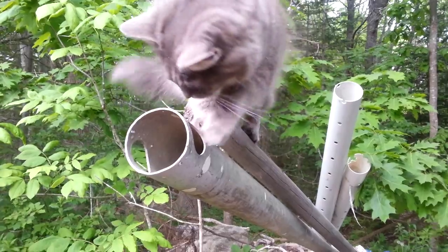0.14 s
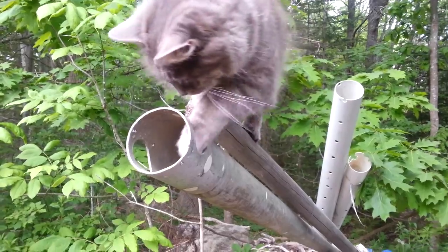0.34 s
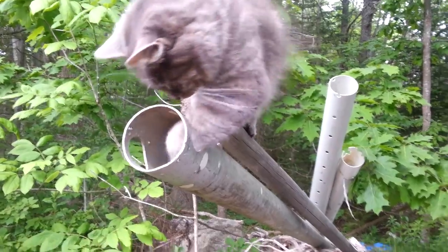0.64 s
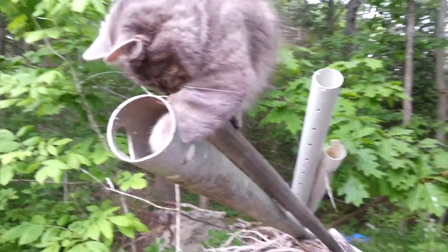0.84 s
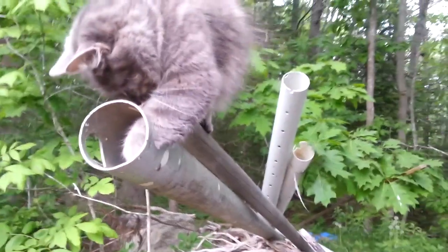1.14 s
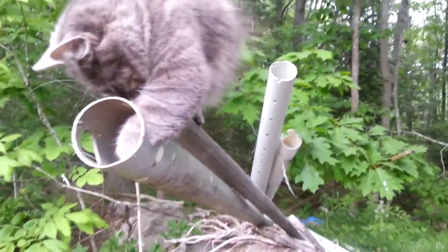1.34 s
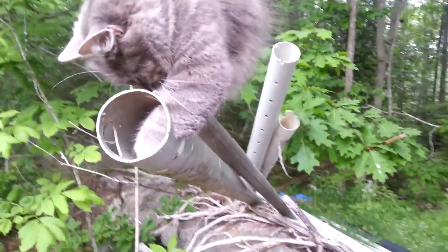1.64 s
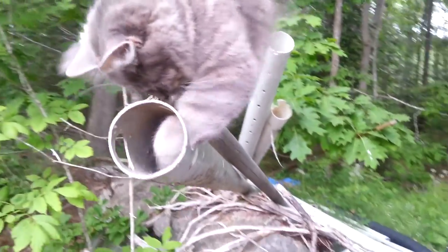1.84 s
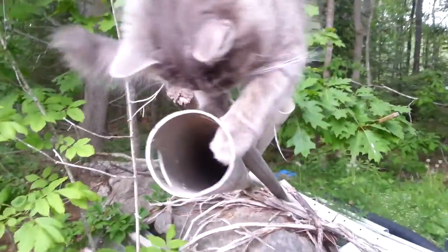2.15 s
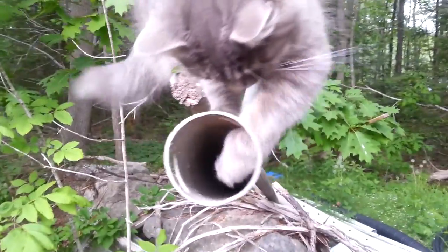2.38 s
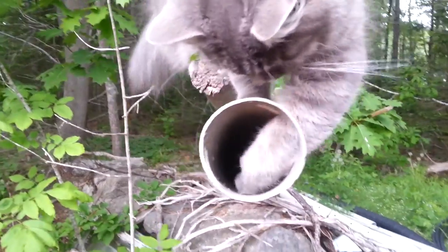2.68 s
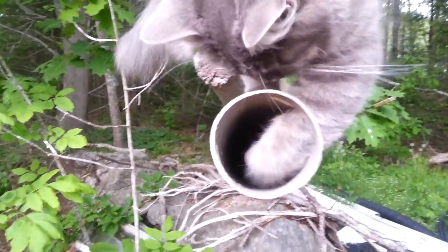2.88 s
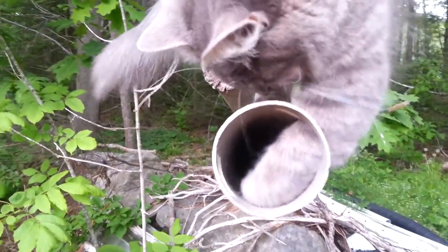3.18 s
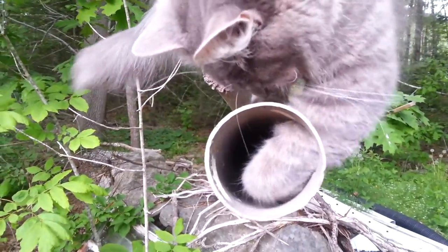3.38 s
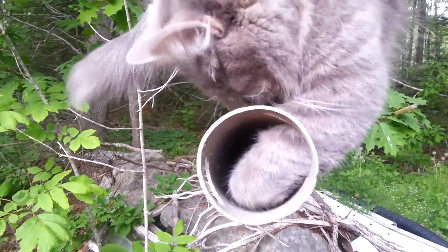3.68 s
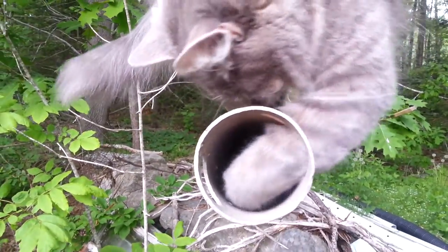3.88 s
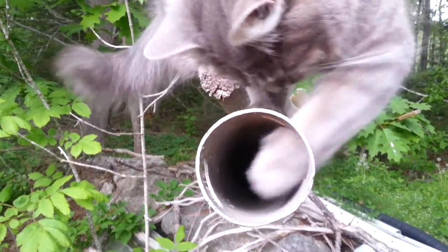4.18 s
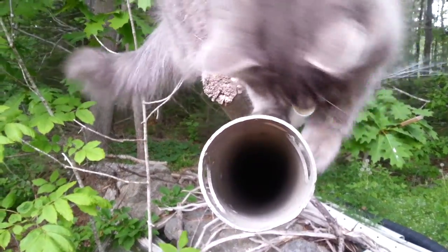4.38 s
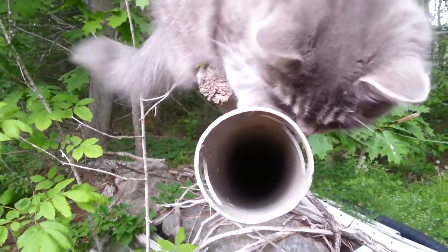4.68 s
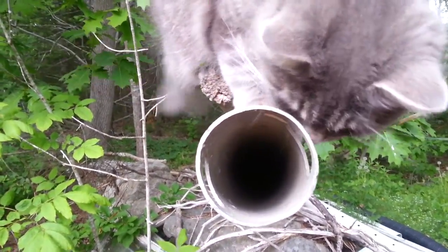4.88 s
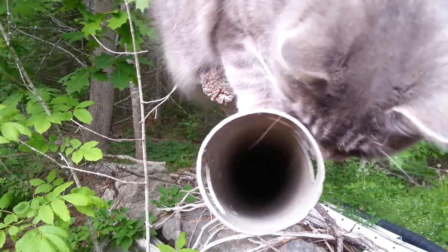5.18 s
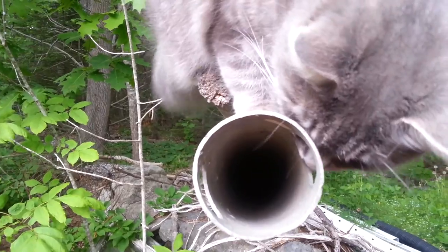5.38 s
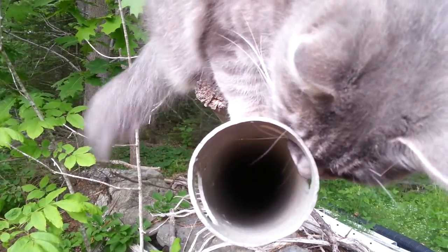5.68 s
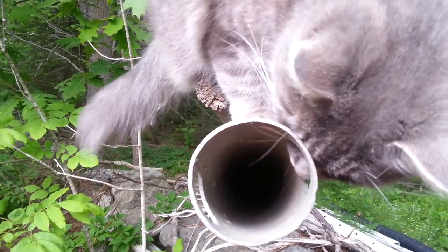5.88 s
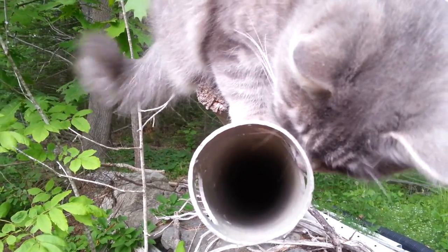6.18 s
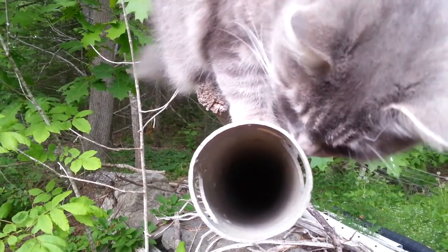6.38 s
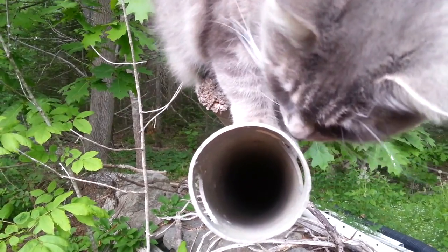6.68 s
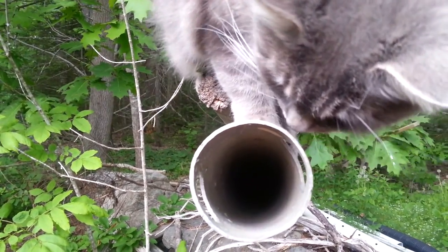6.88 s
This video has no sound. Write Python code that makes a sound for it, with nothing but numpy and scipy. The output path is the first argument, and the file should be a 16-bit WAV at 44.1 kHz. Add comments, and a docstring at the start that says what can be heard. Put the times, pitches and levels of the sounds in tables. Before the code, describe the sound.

A quiet woodland edge with soft low air, a faint wavering engine hum that fades, and a distant road. From inside a plastic pipe, a chipmunk gives nine loud, very short chips at about 0.6, 1.05, 2.0, 2.6, 3.2, 3.7, 4.3, 5.0 and 5.7 seconds. Each whistle arches near 11 kHz and plunges to about 2 kHz in a tenth of a second, throbbing with pipe resonance and leaving a thin outdoor echo. The first is weaker. From 1.1 to 1.5 a rapid run of small falling whistles fades away. Close up, between 0.9 and 2.6, a cat's paw makes dull pad knocks, dry claw ticks and soft fur strokes; lighter touches come near 3.2 and 4.2. After 5.5 the road rises, with hollow fluttering swells around 5.9 and 6.9, and no more chips. The stereo microphone is near the pipe; the loudest chips slightly clip.

```python
"""Nine loud falling chips come first to the ear, and one short trill, from a chipmunk 3 m down a plastic pipe.
Each is a gliding whistle; straight and zigzag waves in the pipe beat together, so every glide throbs.
Close by, a cat paws at the pipe mouth: short noise bursts for pad and claws, swelling noise for fur and leg.
Behind, at the edge of a wood, lie noise for air and a swelling far road, and sines for a fading engine hum."""
import sys
import numpy as np
from scipy import signal
from scipy.fft import rfft, irfft, next_fast_len
from scipy.io import wavfile
from scipy.ndimage import uniform_filter1d, minimum_filter1d

SR = 44100
rng = np.random.default_rng(int(sys.argv[2]) if len(sys.argv) > 2 else 0)


def output_pcm(signal):
    """Save a mono or channel-first signal as 16-bit PCM at the path in sys.argv[1].

    Samples are clipped to [-1, 1] before scaling.
    """
    pcm = np.clip(np.atleast_2d(signal).T, -1, 1) * 32767
    wavfile.write(sys.argv[1], SR, np.round(pcm).astype(np.int16))


N = 310353
TIME = np.arange(N) / SR


def from_db(db):
    """Decibels to gain."""
    return 10 ** (np.asarray(db) / 20)


def curve(rows, t, axis=1):
    """One column of a table, joined by straight lines."""
    rows = np.array(rows)
    return np.interp(t, rows[:, 0], rows[:, axis])


def at_hz(points, hz):
    """A spectrum read on a log-frequency axis."""
    points = np.array(points)
    return np.interp(np.log(hz + 1), np.log(points[:, 0]), points[:, 1])


# how alike noise is at the two microphones: f/Hz, left-right correlation
LIKENESS = [(40, 0.36), (130, 0.54), (500, .42), (1200, 0.0091), (4000, 0.082), (15000, 0.36)]


def noise(spectrum, size=N):
    """Coloured stereo noise of rms 1; mid and side shares set the left-right correlation at each frequency."""
    padded = next_fast_len(size, True)
    hz = np.fft.rfftfreq(padded, 1 / SR)
    mid, side = rfft(rng.standard_normal((2, padded)))
    alike = np.clip(at_hz(LIKENESS, hz), -1, 1)
    both = np.sqrt(1 + alike) * mid + np.sqrt(1 - alike) * side * [[1], [-1]]
    out = irfft(both * from_db(at_hz(spectrum, hz)), padded)[:, :size]
    return out / out.std()


def drift(rate):
    """Random wandering with a spread near 1, through a new value `rate` times a second."""
    return np.interp(TIME * rate, np.arange(4096), rng.standard_normal(4096))


def add(out, start, sound):
    """Mix a sound in at a time in seconds."""
    i = int(start * SR)
    out[..., i:i + sound.shape[-1]] += sound[..., :N - i]


def turn(hz):
    """Running phase of a gliding pitch."""
    return 2 * np.pi * np.cumsum(hz) / SR


def gate(t, first, last, edge=.002):
    """Opens between two times, with short ramps."""
    return np.clip(np.minimum(t - first, last - t) / edge, 0, 1)


def swell(t, middle, length):
    """A smooth rise and fall, above half height for its length."""
    return .5 ** ((2 * (t - middle) / length) ** 2)


# the chips: t/s of the centre, where the whistle falls through about 5 kHz; level/dB before voice and pipe;
# opening arch pitch ratio; duration ratio; t/s from centre to end, before the duration ratio;
# extra level/dB of the low end; closing note level/dB; way along the pipe/m; left gain/dB before its colour
CHIPS = [(.5639, -5.5, 0.96, 1.085, 0.043, -3.5, -64, 3.07, -9.5),
         (1.0545, -1.5, .975, 1.03, 0.037, -7, -63, 3.24, -5.5),
         (2.0185, -1, 1.06, 1.02, .042, -3, -56.5, 3.0, -1.5),
         (2.575, -2, 0.97, 1.04, 0.065, -2.5, -37.5, 3.02, -1),
         (3.2203, .5, 0.98, 1.016, 0.052, -3.5, -39.5, 3.01, -2),
         (3.7442, -4.5, .98, 1.05, 0.042, 0, -39, 3.01, -3.5),
         (4.2633, -0.5, 0.98, 1.037, 0.055, 0.5, -42.5, 3.05, -3),
         (4.965, 0, 1.01, 1.023, 0.06, -1.8, -36.5, 3.09, 0.5),
         (5.691, 0.5, 1, 0.96, 0.057, -0.5, -35, 3.1, -4.5)]
# the glide all chips share, before each one's ratios: t/s from the centre, f/Hz
CHIP_PITCH = [(-.058, 10350), (-.046, 11030), (-.033, 10600), (-.025, 8700), (-.011, 7250), (0, 5020),
              (.014, 3280), (.023, 2620), (.046, 2130)]
# how strongly the voice carries at each pitch: f/Hz, level/dB
VOICE = [(2100, -37.5), (2600, -25.5), (3200, -12), (4100, -2), (5100, 0.5), (6200, -2.5), (7400, -8.5),
         (8500, -7), (9500, -24.5), (11000, -23)]
# all times within a chip are before its duration ratio
CHIP_LEAD_S, CHIP_EDGE_S = .055, .008   # start ahead of the centre; fade in and out
ARCH_S, LOW_END_S = .04, 0.0017   # how far from the centre the arch and the low end take full effect
# the second harmonic flares up late in the fall
OCTAVE_DB, OCTAVE_AT_S, OCTAVE_FADE_DB_PER_S = -9.5, .0215, 1550.5
# a faint low note closes the chip: time from the centre, length, pitch and its sag
CLOSE_AT_S, CLOSE_S, CLOSE_HZ, CLOSE_SAG_HZ_PER_S = .046, 0.015, 1308, 9800


def chips(waver=0.0075, flutter_db=2.5, rasp_db=-35):
    """One whistle arches near 11 kHz, then plunges over two octaves; its loudness follows its pitch."""
    out, t = np.zeros((2, N)), np.arange(-SR // 14, SR // 14) / SR
    wobble, flutter = drift(400), drift(300)
    for k, (s, db, arch, stretch, end, low_db, close_db, way_m, left_db) in enumerate(CHIPS):
        own = slice(k * len(t), (k + 1) * len(t))   # this chip's stretch of the wandering
        u = t / stretch
        hz = uniform_filter1d(curve(CHIP_PITCH, u), size=150) * (1 + waver * wobble[own])
        hz *= 1 + (arch - 1) * np.clip(-u / ARCH_S, 0, 1)
        phase = turn(hz)
        octave_db = OCTAVE_DB - OCTAVE_FADE_DB_PER_S * np.abs(u - OCTAVE_AT_S)
        fundamental = from_db(at_hz(VOICE, hz)) * np.sin(phase)
        octave = from_db(at_hz(VOICE, 2 * hz) + octave_db) * np.sin(2 * phase)
        effort = db + low_db * np.clip(u / LOW_END_S, 0, 1) + flutter_db * flutter[own]
        whistle = (fundamental + octave) * from_db(effort) * gate(u, -CHIP_LEAD_S, end, CHIP_EDGE_S)
        # turbulence in the throat roughens the tone
        turbulence = signal.lfilter([.7], [1, -.7], rng.standard_normal(len(t)))
        whistle *= 1 + from_db(rasp_db) * turbulence
        close_hz = CLOSE_HZ - CLOSE_SAG_HZ_PER_S * (u - CLOSE_AT_S)
        close_level = from_db(close_db) * swell(u, CLOSE_AT_S, CLOSE_S) * gate(t, t[0], t[-1])
        close = close_level * np.sin(turn(close_hz))
        add(out, s + t[0], pipe(whistle + close, way_m, left_db))
    return out


# the trill notes: t/s, length/s, start f/Hz, end f/Hz, starting level/dB before the pipe
TRILL = [(1.112, .013, 7200, 6960, -33), (1.123, 0.015, 6200, 4710, -14), (1.173, 0.014, 5570, 4840, -17.5),
         (1.219, 0.017, 5450, 4610, -20), (1.266, .024, 5370, 4016, -25.5),
         (1.316, .024, 5280, 3716, -25.5), (1.366, .025, 5270, 3670, -27), (1.42, .034, 5350, 3610, -26),
         (1.479, 0.025, 5160, 3600, -31.5)]
TRILL_STRAIGHT_S = .015   # a note of this length falls in a straight line; longer ones hang at the top first
TRILL_EDGE_S, TRILL_FADE_DB = 0.003, 2.5   # ramps at both ends, and fall in level over each note
TRILL_WAY_M, TRILL_LEFT_DB = 3.2, -7   # way along the pipe; left gain before its colour


def trill():
    """A run of short falling whistles that grows fainter."""
    out = np.zeros((2, N))
    for s, length, start_hz, end_hz, db in TRILL:
        t = np.arange(int(length * SR)) / SR
        hz = start_hz + (end_hz - start_hz) * (t / length) ** (length / TRILL_STRAIGHT_S)
        level = from_db(db - TRILL_FADE_DB * t / length) * gate(t, 0, length, TRILL_EDGE_S)
        add(out, s, pipe(level * np.sin(turn(hz)), TRILL_WAY_M, TRILL_LEFT_DB))
    return out


# zigzag waves in the pipe: lowest f/Hz that carries them, signed gain at the left microphone, at the right
PIPE_MODES = [(2631, 0.61, -0.64), (4320, -0.19, 0.13), (5740, .1, .08)]
# the pipe mouth as heard by the left microphone: f/Hz, level/dB
LEFT_COLOUR = [(3000, -4), (4300, -5), (5500, 1), (6800, 1.5), (9000, -2.5), (11000, -2.5)]
SOUND_M_PER_S = 343
# loss while zigzag waves lag behind; their longer way to the left microphone
ZIGZAG_LOSS_DB_PER_S, LEFT_EXTRA_M = 150, 0.13
LEFT_LAG_S = 4.3e-5   # the voice reaches the left microphone a little later


def pipe(call, way_m, left_db):
    """Zigzag waves trail the straight one, most near their lowest pitch, and beat with it at both microphones."""
    size = 16384
    hz = np.fft.rfftfreq(size, 1 / SR)
    travel = np.array([[way_m + LEFT_EXTRA_M], [way_m]]) / SOUND_M_PER_S
    response = 1   # the straight wave
    for lowest_hz, left, right in PIPE_MODES:
        along = np.sqrt(np.maximum(hz ** 2 - lowest_hz ** 2, 1))
        lag = travel * np.maximum(hz / along - 1, 0)
        carried = np.array([[left], [right]]) * (hz > lowest_hz)
        strength = carried * from_db(-ZIGZAG_LOSS_DB_PER_S * lag)
        response = response + strength * np.exp(2j * np.pi * travel * (hz - along))
    left_delay = np.exp(-2j * np.pi * hz * LEFT_LAG_S)
    response[0] *= from_db(left_db + at_hz(LEFT_COLOUR, hz)) * left_delay
    return irfft(rfft(call, size) * response, size)


def tail(x, colour, t60, onset, ragged_db=3):
    """Countless echoes of uneven strength, as decaying noise, that build up and die away."""
    t = np.arange(SR) / SR
    response = noise(colour, size=SR) * from_db(-60 * t / t60) * (1 - np.exp(-(t / onset) ** 2))
    response *= from_db(ragged_db * drift(500)[:SR])
    response /= np.sqrt(np.sum(response ** 2) / 2)
    return signal.fftconvolve(x[None], response, axes=1)[:, :N]


# scatter from nearby stones and leaves: f/Hz, relative level/dB
SCATTER = [(1200, -9.5), (2200, -3.5), (3000, 4), (4200, 1), (6000, -7), (8500, -4.5), (11000, -25.5)]
# echo from the trees: f/Hz, relative level/dB
WOODS = [(1200, -4.5), (3000, -2), (4800, 1), (6500, -8), (8500, -10.5), (11000, -18)]


def chipmunk(scatter_db=-21, woods_db=-39):
    """The voice leaves the pipe, then scatters off nearby stones and leaves and through the wood."""
    voice = chips() + trill()
    source = voice.mean(axis=0)
    scatter = from_db(scatter_db) * tail(source, SCATTER, t60=.12, onset=0.019)
    woods = from_db(woods_db) * tail(source, WOODS, t60=.42, onset=0.011)
    return voice + scatter + woods


# paw taps on the pipe: t/s, pad knock level/dB, claw tick level/dB, both before tap_db
PAW_TAPS = [(.942, -47, -53), (1.035, -32, -21.5), (1.121, -28.5, -26.5), (1.352, -31.5, -58),
            (1.62, -37, -44), (1.682, -57, -31), (1.871, -34, -17.5), (1.926, -40, -48),
            (1.961, -30.5, -45), (2.103, -28.5, -43), (2.14, -50.5, -33), (2.332, -59, -31),
            (2.36, -55, -27), (2.523, -68, -33.5), (2.563, -32, -42.5), (3.157, -36.5, -40),
            (4.197, -53.5, -38)]
# colour of pad on plastic, also of the leg's rub: f/Hz, relative level/dB
KNOCK = [(150, -21), (450, 0.5), (900, -5), (1500, -7), (2500, -20.5), (6000, -18), (14000, -36)]
# colour of claw on plastic: f/Hz, relative level/dB
CLAW = [(500, -22.5), (1800, -11), (2600, 1), (3600, 1.5), (5000, -13), (8000, -26.5), (14000, -26)]


def paw_taps(knock_t60=0.047, claw_t60=0.015, tap_db=-4):
    """The pad knocks dully and the claws tick on the plastic, each a fast-dying noise burst."""
    out, t = np.zeros((2, N)), np.arange(SR // 10) / SR
    for s, knock_db, claw_db in PAW_TAPS:
        knock = noise(KNOCK, size=len(t)) * from_db(knock_db - 60 * t / knock_t60)
        claw = noise(CLAW, size=len(t)) * from_db(claw_db - 60 * t / claw_t60)
        add(out, s, from_db(tap_db) * (knock + claw) * gate(t, 0, t[-1], edge=0.00065))
    return out


# strokes of the foreleg inside the pipe: middle t/s, length/s, fur hiss level/dB, dull rub level/dB
STROKES = [(0.993, .1, -65, -51), (1.16, .2, -49.5, -55), (1.34, .12, -57, -51), (1.698, .16, -45.5, -64),
           (1.9, .2, -53.5, -61), (2.123, .06, -49, -62), (2.264, .3, -58, -65), (2.695, .35, -58, -58),
           (2.978, 0.045, -53, -77), (3.3, .4, -65.5, -67)]
# colour of fur on plastic: f/Hz, relative level/dB
FUR = [(400, -10.5), (800, -5.5), (1420, -1.5), (2240, -3), (4290, 0.5), (8000, -13), (14500, -18.5)]


def paw_strokes(grain_db=4, judder_db=2.5):
    """With each stroke fur hisses unevenly along the plastic and the leg rubs the wall."""
    fur = sum(from_db(db) * swell(TIME, s, length) for s, length, db, _ in STROKES)
    rub = sum(from_db(db) * swell(TIME, s, length) for s, length, _, db in STROKES)
    hiss = fur * from_db(grain_db * drift(250)) * noise(FUR)
    return hiss + rub * from_db(judder_db * drift(60)) * noise(KNOCK)


# outdoor air: f/Hz, relative level/dB
AIR = [(20, -40.5), (40, -29), (65, -12.5), (106, -15.5), (200, -6), (330, -6.5), (513, -14), (859, -13.5),
       (1100, -18), (1550, -21.5), (4140, -25), (6500, -32), (10000, -29.5), (14500, -32)]
# tyre noise on the far road: t/s, level/dB
ROAD = [(0, -78), (1, -57.5), (2.5, -56), (5.48, -53.5), (5.75, -47.5), (6.2, -50), (6.7, -48),
        (7.04, -47.5)]
# its colour: f/Hz, relative level/dB
TYRES = [(200, -25.5), (450, -13), (650, -5), (820, 0), (1050, -5), (1500, -10), (2500, -23), (5000, -37)]
# far engine partials: f/Hz, level/dB before HUM_LEVEL
HUM = [(118.4, -58.5), (177.6, -59.5), (232, -59.5), (290.7, -62), (349.9, -59)]
# course of the whole hum: t/s, level/dB
HUM_LEVEL = [(0, 0.5), (1.3, -11), (2, -7), (7.04, -16)]


def distance(air_db=-52.5, hum_waver=0.0027, hum_flutter_db=2.0):
    """Outdoor air, tyres on a far road and a wavering engine hum whose partials share one speed."""
    air = from_db(air_db) * noise(AIR)
    road = from_db(curve(ROAD, TIME) + 1.3 * drift(11)) * noise(TYRES)
    speed = 1 + hum_waver * drift(3.4)
    hum = 0
    for hz, db in HUM:
        hum = hum + from_db(db + hum_flutter_db * drift(6.6)) * np.sin(turn(hz * speed))
    return air + road + hum * from_db(curve(HUM_LEVEL, TIME))


# swells of a hollow note in the road noise: middle t/s, length/s, level/dB
HOLLOW_SWELLS = [(5.921, 0.56, -50.5), (6.899, 0.77, -54.5)]
# the colour of that note: f/Hz, relative level/dB
HOLLOW_COLOUR = [(400, -36), (660, -12.5), (800, 0), (900, -1), (1100, -18), (3000, -53.5)]


def hollow_note(flutter_db=5.5):
    """Narrow noise gives the road a hollow, fluttering ring that swells and sinks."""
    level = sum(from_db(db) * swell(TIME, s, length) for s, length, db in HOLLOW_SWELLS)
    return level * from_db(flutter_db * drift(17)) * noise(HOLLOW_COLOUR)


def scene():
    """Chipmunk, cat and background together."""
    return chipmunk() + paw_taps() + paw_strokes() + distance() + hollow_note()


def limiter(x):
    """Turns each channel down for a few milliseconds wherever it would pass the ceiling."""
    ceiling, hold = 1.18, 131   # amplitude, samples
    gain = np.minimum(1, ceiling / (np.abs(x) + 1e-9))
    return x * uniform_filter1d(minimum_filter1d(gain, hold, axis=1), hold, axis=1)


def record(dry):
    """Peaks are limited to a ceiling above full scale, so the loudest clip slightly; then the top is cut."""
    clipped = np.clip(limiter(dry), -1, 1)
    top_cut = signal.ellip(10, .05, 60, 14800, fs=SR, output="sos")   # cutoff in Hz
    return signal.sosfiltfilt(top_cut, clipped)


dry = scene()
out = record(dry)
output_pcm(out)
```